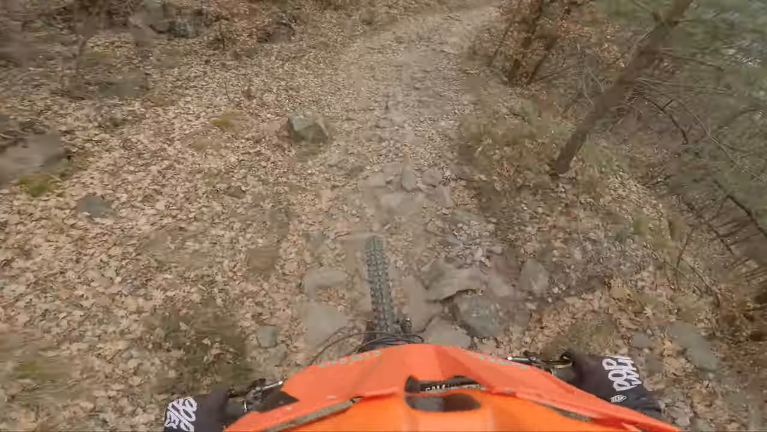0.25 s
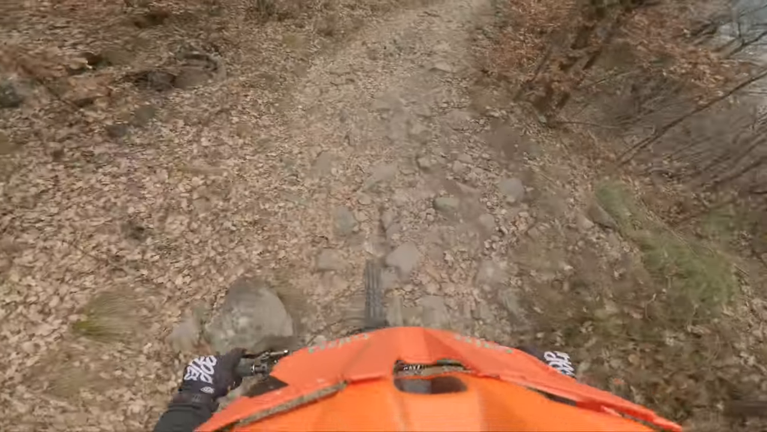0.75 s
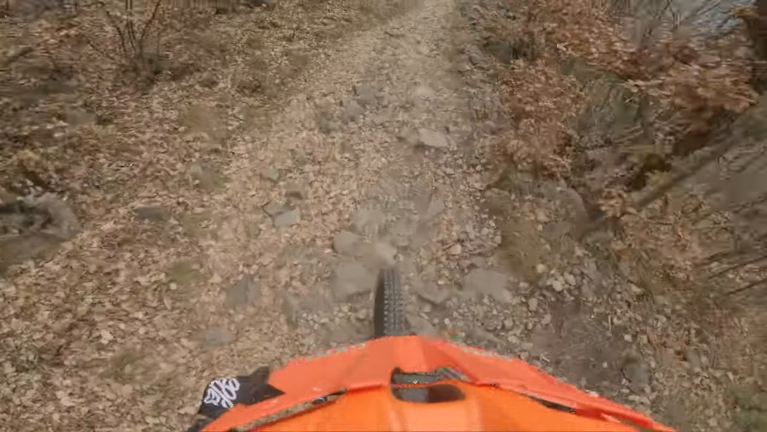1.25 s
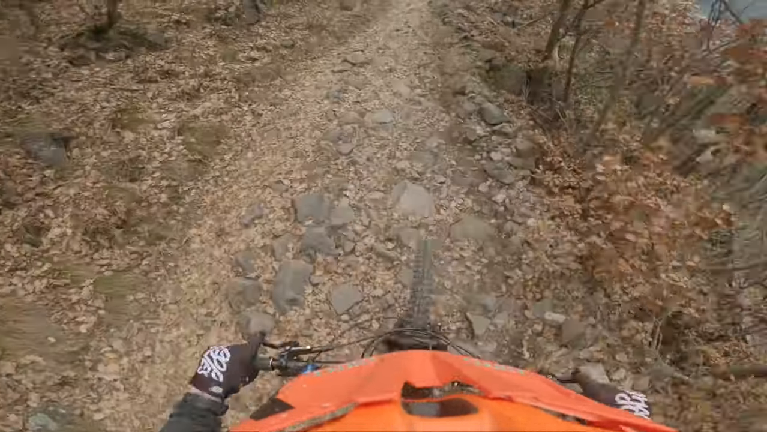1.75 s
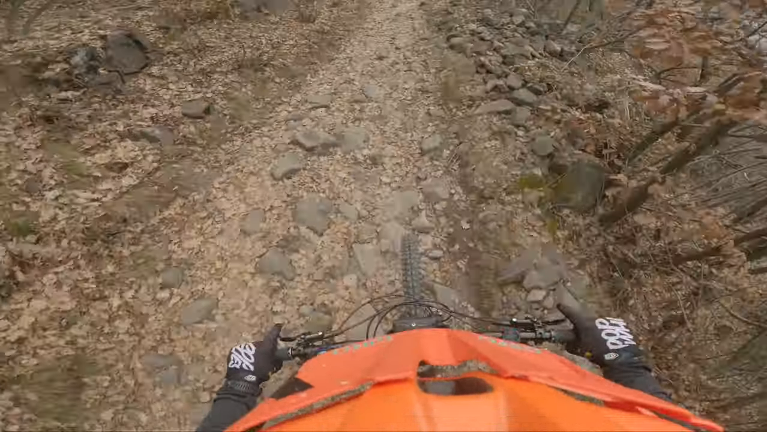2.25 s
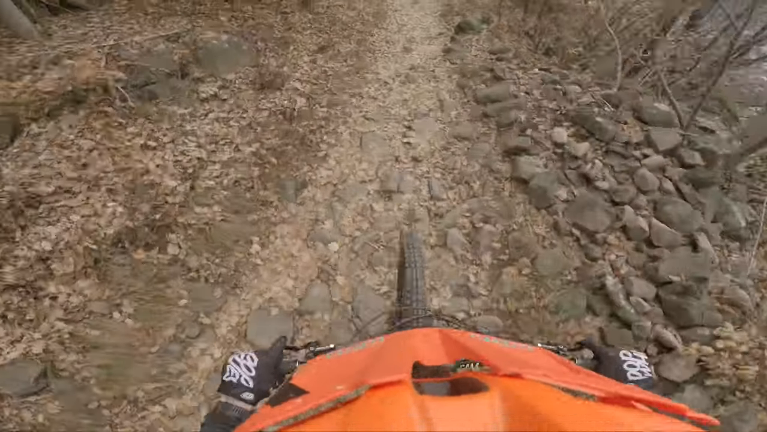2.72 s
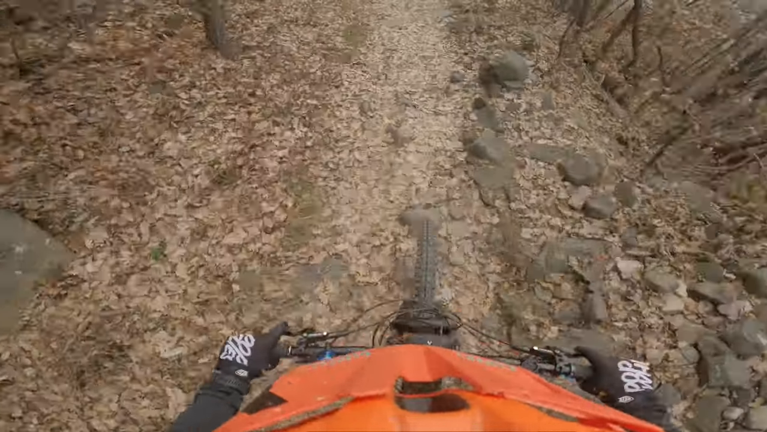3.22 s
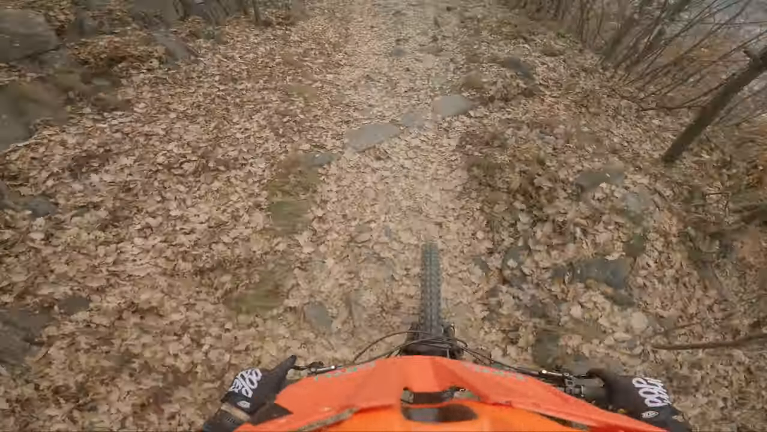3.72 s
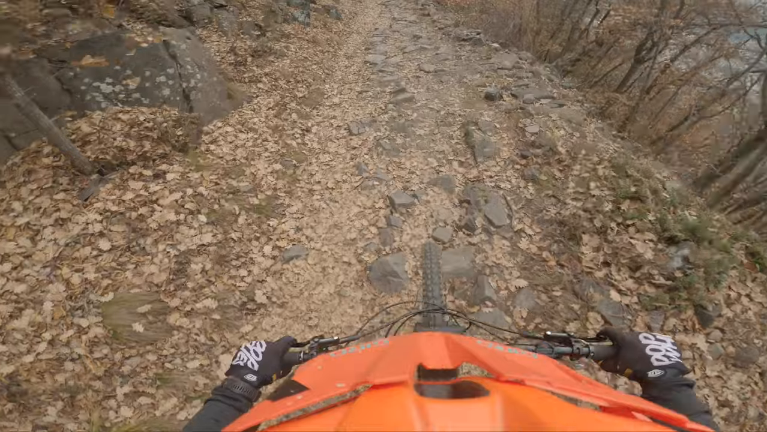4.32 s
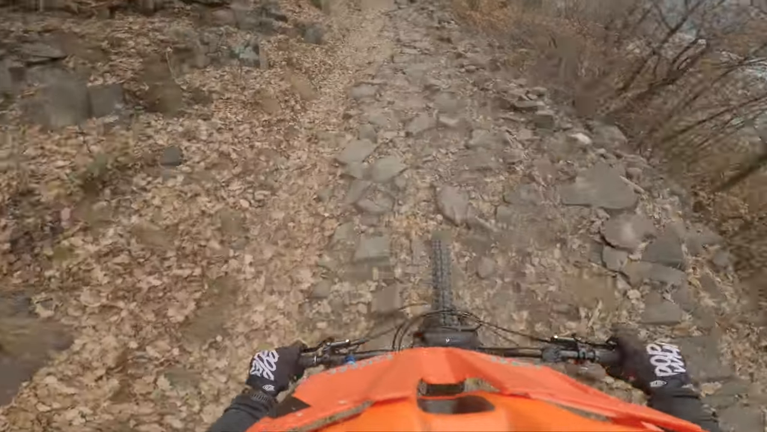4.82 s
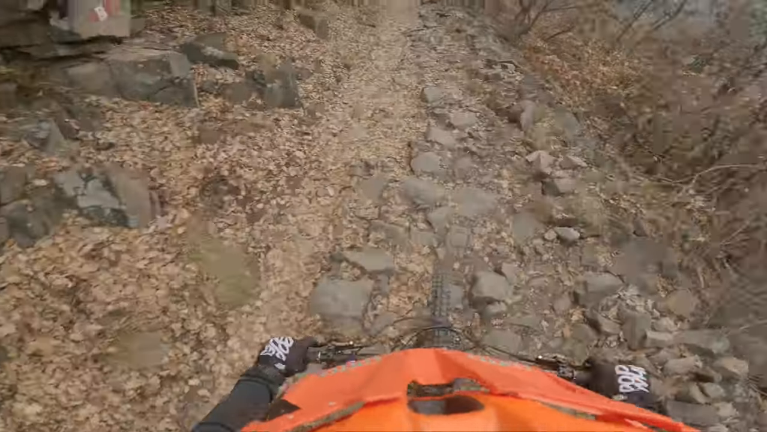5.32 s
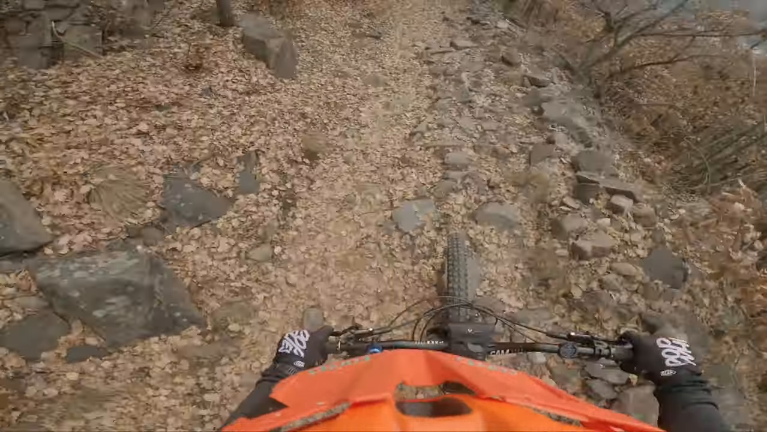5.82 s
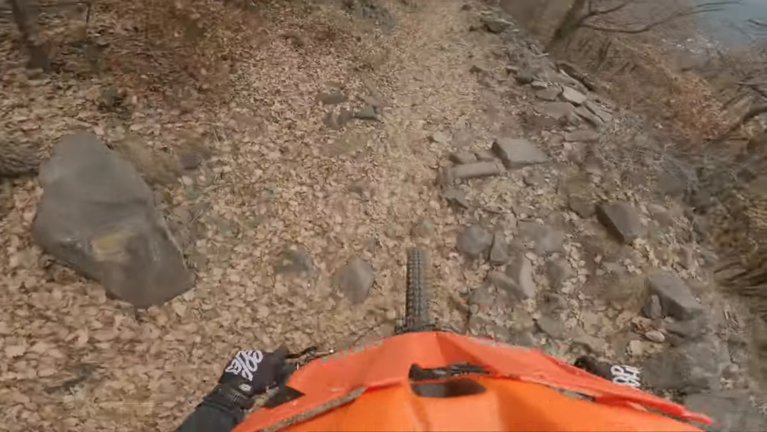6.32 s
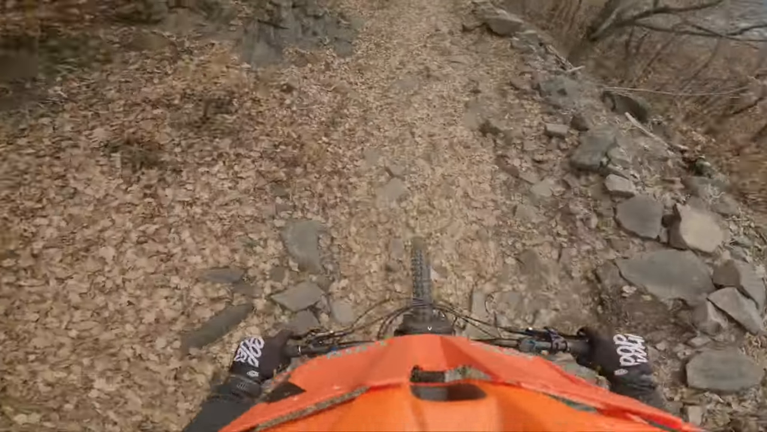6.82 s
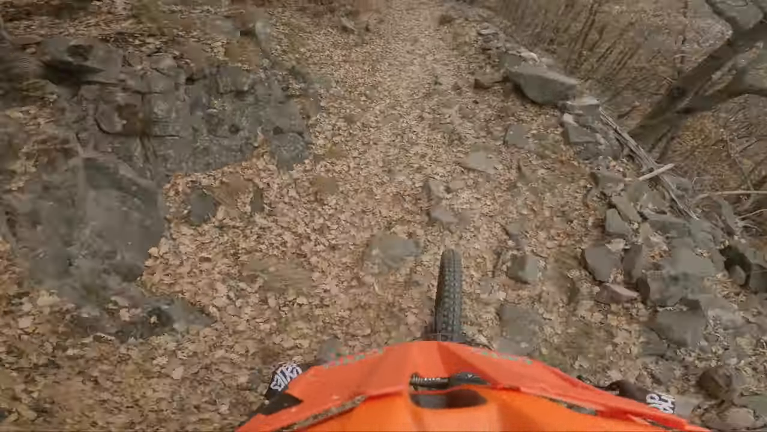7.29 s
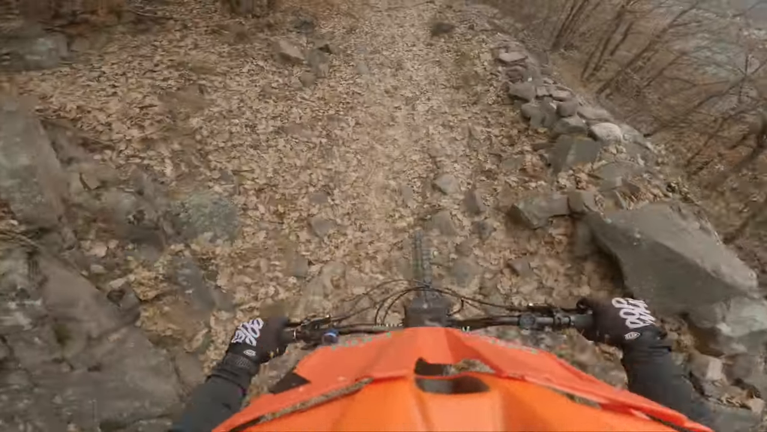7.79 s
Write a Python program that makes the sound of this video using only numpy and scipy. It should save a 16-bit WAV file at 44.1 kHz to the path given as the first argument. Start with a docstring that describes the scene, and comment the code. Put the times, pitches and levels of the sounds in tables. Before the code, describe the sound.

A mountain bike rolls quickly down a rocky forest trail for eight seconds, heard in mono from the rider's helmet. Throughout, tyres crunch stones and crackle dry leaves in clumpy bursts, with quick scuffs and tiny dropouts as the wheel skips, notably near 1.2, 2.0, 6.1 and 6.5 s. Irregular, very short, dry rock knocks strike the frame about a dozen times a second, amid fine pings of small stones and bright, thin metal ticks. Dull tyre thumps land strongly around 0.7, 2.0, 3.75, 4.2, 4.65, 5.8 and 6.35 s. Low wind buffets beneath, gusting sharply near 0.7 s, easing somewhat from 1.3 to 3.3 s, then growing heavier, especially 4 to 5.5 s, with further brief gusts until 7.6 s. A faint steady air hiss lies behind; peaks sound compressed and the very highest treble is dulled. The rattling continues right to the end.

```python
"""A mountain bike rolls down a stony trail, heard from the rider's helmet: its tyres crunch stones and
dry leaves (crackling noise), small stones ping the frame tubes and rocks knock them (fading sine tones).
Wind buffets the microphone port (low noise with sharper gusts), over a thin hiss of air.
A small metal part ticks brightly, and rocks thump the tyre casing with short dull notes."""
import sys
import numpy as np
from scipy import signal
from scipy.fft import rfft, irfft, next_fast_len
from scipy.io import wavfile
from scipy.ndimage import map_coordinates

SR = 44100
rng = np.random.default_rng(int(sys.argv[2]) if len(sys.argv) > 2 else 0)


def field_ratio(decibels):
    """Amplitude ratio for a level in dB (20 dB per decade); scalars and array-likes work."""
    return 10 ** (np.asarray(decibels, dtype=float) / 20)


def unload_wav(signal):
    """Save mono or channel-first audio to the path in sys.argv[1] as 16-bit WAV at rate SR, clipped to [-1, 1]."""
    wavfile.write(
        sys.argv[1],
        SR,
        np.round(np.clip(np.atleast_2d(signal).T, -1, 1) * 32767).astype(np.int16),
    )


N = 355137


def unit(x):
    """Scales a sound to rms 1."""
    return x / np.sqrt(np.mean(x ** 2) + 1e-20)


def curves(rows):
    """Draws straight lines between table rows: one curve for each column after the time."""
    s, *cols = np.transpose(rows)
    return [np.interp(np.arange(N) / SR, s, c) for c in cols]


def wobble(rate):
    """A smooth random curve with this many random points a second."""
    return map_coordinates(rng.standard_normal(N // 100), [np.arange(N) * rate / SR])


def coloured(x, spectrum):
    """Filters x through f/Hz, level/dB points, joined on a log frequency axis, to rms 1."""
    m = next_fast_len(N + 8192)  # spare room for the filter's tail
    hz, db = np.transpose(spectrum)
    log_hz = np.log(np.fft.rfftfreq(m, 1 / SR) + 1)
    gain = field_ratio(np.interp(log_hz, np.log(hz + 1), db))
    return unit(irfft(rfft(x, m) * gain, m)[:N])


def crackle(per_s, spread_db, life_s, hiss):
    """Short fading noise bursts of very uneven size, plus steady hiss."""
    when, size = rng.random(N), rng.exponential(size=N)
    starts = (when < per_s / SR) * field_ratio(spread_db * np.minimum(size, 3))
    t = np.arange(SR // 50) / SR
    bursts = np.abs(signal.fftconvolve(starts, np.exp(-t / life_s))[:N])
    return unit(bursts * rng.standard_normal(N)) + hiss * rng.standard_normal(N)


def ring(modes, attack_s, detune, crack):
    """One blow: each mode (a fading tone) varies in strength, pitch and phase; contact noise roughens it."""
    t = np.arange(SR // 16) / SR
    hz, db, t60 = np.transpose(modes)[:, :, None]
    strength, pitch, phase = rng.standard_normal((3, len(modes), 1))
    fade = field_ratio(db + 2 * strength - 60 * t / t60)
    partials = fade * np.sin(2 * np.pi * (hz * (1 + detune * pitch) * t + phase))
    contact_noise = np.convolve(rng.standard_normal(len(t)), np.hanning(32) / 8, "same")
    attack = (1 - np.exp(-t / attack_s)) ** 2
    return partials.sum(axis=0) * (1 + crack * contact_noise) * attack


def add(track, s, sound):
    """Mixes a sound into the track at time s."""
    part = track[max(round(s * SR), 0):][:len(sound)]
    part += sound[:len(part)]


def swell(peaks, rise_s, fall_s):
    """Spreads each peak into a rise before it and a fall after it."""
    t = np.arange(-SR // 8, SR // 8) / SR
    shape = np.exp(-np.abs(t) / np.where(t < 0, rise_s, fall_s))
    return np.abs(signal.fftconvolve(peaks, shape, "same"))


def held(rows, rise_s, fall_s):
    """Turns (start, length, dB) rows into a level curve with soft ends."""
    level = np.zeros(N)
    for s, length_s, db in rows:
        level[round(s * SR):round((s + length_s) * SR)] = field_ratio(db)
    return swell(level, rise_s, fall_s) / ((rise_s + fall_s) * SR)


def at_random(per_s):
    """Chance moments, each with three normal draws."""
    rows = rng.standard_normal((100, 3))
    s = np.cumsum(rng.exponential(size=100)) / per_s
    return np.column_stack([s, rows])[s < N / SR]


# Wind strength over time: [t/s, buffet level/dB, edge level/dB between gusts]
WIND_LEVELS = [(0.0, -24, -42), (0.22, -30, -45), (0.85, -19, -29.5), (0.94, -32, -36), (1.25, -25, -35),
               (1.34, -30.5, -38), (3.34, -24.5, -36.5), (3.81, -29.5, -34.5), (4.12, -20, -30),
               (4.75, -20, -24), (5.04, -16.5, -27), (5.09, -24.5, -36), (5.38, -17, -31),
               (5.58, -20.5, -40), (6.25, -21.5, -36), (6.95, -23, -31), (6.99, -29.5, -41),
               (7.17, -20.5, -31.5), (7.76, -22.5, -38), (8.05, -20, -39)]
# Sharp gusts: [start t/s, length t/s, edge level/dB before the ends are softened]
SHARP_GUSTS = [(0.052, 0.044, -23), (0.657, 0.043, -21.5), (0.757, 0.11, -21), (1.196, 0.036, -21),
               (2.236, 0.042, -21.5), (2.74, 0.041, -26), (3.47, 0.032, -20), (3.741, 0.032, -24),
               (4.018, 0.076, -19), (4.15, 0.12, -19), (4.307, 0.027, -32), (4.373, 0.63, -25.5),
               (5.166, 0.2, -25), (5.426, 0.066, -24), (5.744, 0.093, -19.5), (5.872, 0.084, -26.5),
               (6.073, 0.041, -23.5), (6.186, 0.04, -18.5), (6.272, 0.11, -23), (6.605, 0.027, -18),
               (6.9, 0.077, -23.5), (7.576, 0.05, -19.5)]
# Tone colour of the low buffet: [f/Hz, relative level/dB]
BUFFET_COLOUR = [(8.8, -39), (15, 2.5), (59, 9.5), (115, 3), (161, -10), (200, -31), (260, -53),
                 (440, -120)]
# Tone colour of the higher edge: [f/Hz, relative level/dB]
EDGE_COLOUR = [(65, -34), (110, 3), (157, 0), (204, 0), (346, -14), (700, -34), (910, -63), (1540, -120)]


def wind():
    """Eddies push the microphone port in lumps of low noise; sharper gusts reach higher."""
    buffet_db, edge_db = curves(WIND_LEVELS)
    gusts = held(SHARP_GUSTS, rise_s=0.0091, fall_s=0.012)
    lumps = wobble(24)
    buffet = unit(field_ratio(0.81 * lumps) * coloured(rng.standard_normal(N), BUFFET_COLOUR))
    flutter = field_ratio(2 * lumps + 3 * wobble(45))
    edge = unit(flutter * coloured(rng.standard_normal(N), EDGE_COLOUR))
    # a gust pushes the buffet too, 3 dB less than the edge
    buffet_level = np.hypot(field_ratio(buffet_db), field_ratio(-3) * gusts)
    edge_level = np.hypot(field_ratio(edge_db), gusts)
    return buffet_level * buffet + edge_level * edge


# Rolling tyres, before skips and scuffs: [t/s, stone crunch level/dB, leaf rustle level/dB]
ROLLING_LEVELS = [(0.0, -32.5, -41.5), (0.47, -31.5, -45), (0.76, -32, -41.5), (1.93, -30.5, -38.5),
                  (2.42, -32, -44), (2.6, -30.5, -38.5), (3.79, -30, -38.5), (4.31, -32.5, -42),
                  (4.75, -34, -43), (5.56, -30.5, -41), (5.72, -29.5, -36), (6.57, -33.5, -38.5),
                  (7.11, -31, -41.5), (8.05, -32, -35.5)]
# The wheel skips: [middle t/s, half length t/s, level/dB lost (below zero: gained)]
WHEEL_SKIPS = [(.19, 0.018, 3), (0.325, .04, 4), (0.55, 0.066, 8), (.66, 0.018, 5.5), (0.965, 0.017, 6),
               (1.09, 0.027, 6), (1.218, 0.028, 22), (1.414, 0.016, 14), (1.526, 0.022, 7.5),
               (1.735, 0.072, 3.5), (2.046, 0.026, 18), (3.075, 0.022, 15), (3.425, .04, 6),
               (3.635, 0.013, 9), (4.38, 0.026, 2.5), (4.488, .02, 9), (4.61, 0.028, 1), (4.714, 0.012, -1),
               (5.16, 0.054, 4.5), (5.264, .02, 5), (5.682, 0.063, 8), (5.802, 0.069, 9.5),
               (5.88, 0.029, 11), (6.076, 0.022, 22), (6.248, 0.033, 6.5), (6.37, 0.018, 3),
               (6.546, .04, 16), (6.922, 0.023, 8), (7.093, 0.018, 16), (7.466, 0.016, 5)]
# The tread drags through loose stones: [start t/s, length t/s, level/dB before the ends are softened]
TREAD_SCUFFS = [(0.045, 0.046, -27.5), (0.37, 0.071, -31), (0.898, 0.027, -29.5), (1.051, 0.025, -24.5),
                (1.118, 0.032, -27), (1.222, 0.028, -23.5), (1.427, 0.032, -26), (1.584, 0.051, -27),
                (1.644, 0.047, -26), (1.75, 0.048, -33), (1.894, 0.022, -28.5), (1.949, 0.12, -27),
                (2.107, 0.039, -24.5), (2.393, 0.066, -28), (2.577, 0.022, -23), (2.633, 0.094, -30.5),
                (2.746, 0.034, -30.5), (2.794, 0.075, -31), (3.034, 0.034, -24.5), (3.167, 0.032, -26),
                (3.246, 0.038, -24.5), (3.339, 0.051, -25), (3.507, 0.022, -25), (3.559, 0.052, -30.5),
                (3.742, 0.042, -28), (3.815, 0.024, -27.5), (4.064, 0.051, -26), (4.636, 0.057, -27),
                (4.974, 0.023, -24.5), (5.222, 0.026, -24.5), (5.352, 0.023, -24), (5.595, 0.023, -24.5),
                (5.636, 0.027, -21.5), (5.713, 0.03, -26), (5.897, 0.032, -27.5), (6.084, 0.071, -26.5),
                (6.3, 0.042, -27.5), (6.421, 0.065, -25), (6.522, 0.032, -25.5), (6.588, 0.063, -30.5),
                (6.939, 0.036, -23.5), (7.109, 0.041, -30), (7.277, 0.025, -29), (7.346, 0.058, -31.5),
                (7.685, 0.025, -28.5), (7.968, 0.03, -25), (8.02, 0.037, -29)]


def tread():
    """Levels of crunch and rustle: scuffs raise them, and rolling drops as the wheel skips."""
    t = np.arange(N) / SR
    skip_db = sum(loss_db * np.clip(1 - np.abs(t - s) / half_s, 0, 1) for s, half_s, loss_db in WHEEL_SKIPS)
    scuff = held(TREAD_SCUFFS, rise_s=0.0068, fall_s=0.0068)
    crunch, rustle = [field_ratio(db - skip_db) for db in curves(ROLLING_LEVELS)]
    leaf_scuff = field_ratio(-12) * scuff  # leaves lie under the stones
    return np.hypot(crunch, scuff), np.hypot(rustle, leaf_scuff)


# Tone colour of crunching stones: [f/Hz, relative level/dB]
STONE_COLOUR = [(210, 5), (350, -1), (791, -3), (1110, -3.5), (1600, -0.5), (1940, -5), (2430, -3.5),
                (4000, -27), (5200, -36), (8800, -120)]
# Tone colour of dry leaves, also lent to the air hiss: [f/Hz, relative level/dB]
LEAF_COLOUR = [(1760, -14), (3000, -3.5), (3680, -6), (4960, -10.5), (5980, -16), (7720, -20), (9150, -28),
               (11600, -39), (15100, -54), (22000, -120)]


def tyres():
    """Stones grind and leaves snap in clumps of crackle, as the tread loads and unloads."""
    crunch, rustle = tread()
    load = wobble(28)
    stone_crackle = crackle(per_s=180, spread_db=8.8, life_s=0.0056, hiss=0.92)
    stones = unit(field_ratio(1.07 * load) * coloured(stone_crackle, STONE_COLOUR))
    leaf_crackle = crackle(per_s=350, spread_db=9.3, life_s=0.0033, hiss=1.0)
    leaf_swing = field_ratio(1.03 * load + 1.6 * wobble(16))
    leaves = unit(leaf_swing * coloured(leaf_crackle, LEAF_COLOUR))
    return crunch * stones + rustle * leaves


def air():
    """Air past the helmet: a thin, nearly even hiss around -55 dB."""
    return field_ratio(-55 + 1.2 * wobble(11.0)) * coloured(rng.standard_normal(N), LEAF_COLOUR)


# Ringing tones of the frame in low, middle and high groups: [f/Hz, relative level/dB, 60 dB fade t/s]
FRAME_MODES = [
    [(643, -14, 0.014), (747, -4.5, 0.0064), (992, -8.5, 0.03), (1185, -4, 0.019), (1506, -3, 0.0095)],
    [(2418, 7, 0.013), (2754, 6.5, 0.0097), (3207, 0.5, 0.012)],
    [(3940, 10.5, 0.011), (5090, -1, 0.016), (5600, -4.5, 0.018)],
]
# Small stones hitting each of those groups: [pings per s, level/dB relative to the crunch]
STONE_PINGS = [(70, -7), (70, -16), (110, -40.5)]


def rattle():
    """Small stones of six kinds ping the frame at random, more loudly where the crunch is loud."""
    out = np.zeros(N)
    for modes, (per_s, db) in zip(FRAME_MODES, STONE_PINGS):
        when, size = rng.random((6, N)), rng.exponential(size=N)
        pings = (when < per_s / 6 / SR) * field_ratio(2.5 * np.minimum(size, 3))
        # each kind has its own pitch and strength
        kinds = [ring(modes, attack_s=0.00034, detune=0.099, crack=1.0) for _ in pings]
        pinging = signal.fftconvolve(pings, kinds, axes=1)[:, :N].sum(axis=0)
        out += field_ratio(db) * unit(pinging)
    crunch, _ = tread()
    return crunch * out


# Rock strikes: [t/s, level/dB of the low, of the middle and of the high frame modes]
ROCK_STRIKES = [(0.018, -26, -30, -39), (0.04, -12, -28, -29), (0.1, -26, -23, -40), (0.358, -22, -24, -39),
                (0.381, -26, -21.5, -28), (0.491, -21, -31, -34), (0.607, -28, -24, -44),
                (0.681, -11, -24.5, -39), (0.717, -12, -19, -33), (0.826, -12.5, -22.5, -32),
                (0.865, -13, -26, -45), (0.899, -7, -36, -41), (0.983, -21, -21, -38),
                (1.046, -20, -23, -39), (1.058, -6.5, -34, -41), (1.185, -21, -14.5, -34),
                (1.221, -23, -22, -35), (1.419, -20, -38, -38), (1.496, -13, -24.5, -24.5),
                (1.551, -22, -24.5, -28), (1.608, -20, -24, -25.5), (1.666, -27, -19.5, -33),
                (1.685, -18, -15.5, -30), (1.744, -33, -20, -32), (1.767, -20, -21, -26),
                (1.832, -22, -21.5, -34), (1.895, -15, -28, -30), (2.05, -20, -19, -47),
                (2.073, -25, -15.5, -25), (2.118, -22, -21, -32), (2.139, -12, -22, -22),
                (2.204, -15.5, -25, -32), (2.253, -12, -35, -32.5), (2.348, -16, -29, -40),
                (2.423, -19, -22.5, -24), (2.487, -13.5, -18, -32), (2.577, -16, -21, -31),
                (2.666, -18, -18.5, -30), (2.75, -19, -17.5, -38), (2.805, -23, -28, -25),
                (2.844, -15, -17.5, -29), (2.976, -20, -16.5, -33), (3.034, -13, -38, -38),
                (3.053, -6, -36, -45), (3.107, -17, -19, -26), (3.256, -15, -27, -36),
                (3.293, -17, -22, -22), (3.347, -15, -27, -44), (3.395, -15, -20, -48),
                (3.515, -25, -18.5, -38), (3.624, -23, -14.5, -25), (3.71, -27, -17.5, -35),
                (3.755, -12, -22, -29), (3.831, -23, -18.5, -32), (3.954, -17.5, -34, -27),
                (4.035, -11, -36, -42), (4.075, -16, -17, -39), (4.191, -17, -21, -41),
                (4.459, -19, -20.5, -23), (4.636, -13, -28, -40), (4.655, -27, -25, -35),
                (4.723, -19, -25, -40), (4.901, -35, -26.5, -44), (4.932, -22, -24, -30),
                (4.984, -6.5, -32, -49), (5.226, -23, -29, -30), (5.359, -20, -16, -39),
                (5.469, -17.5, -20, -31), (5.615, -30, -24, -27.5), (5.649, -14, -20, -29),
                (5.723, -24, -30, -39), (5.844, -14, -42, -33), (5.898, -28, -21, -27),
                (6.003, -27, -27, -33), (6.091, -9, -28, -43), (6.185, -16, -20.5, -36),
                (6.273, -28, -20.5, -38), (6.321, -22.5, -23, -27.5), (6.428, -26, -14, -35),
                (6.475, -10, -23, -23), (6.528, -24, -18, -36), (6.543, -27, -12, -24),
                (6.618, -11, -19, -27), (6.647, -11, -29, -25.5), (6.695, -22, -21, -45),
                (6.763, -17, -19, -28), (6.832, -24, -16.5, -45), (6.946, -24, -27, -35),
                (6.959, -18, -30, -37), (7.063, -16, -14.5, -34), (7.104, -23, -23.5, -29),
                (7.133, -31, -30, -25), (7.267, -13.5, -21, -49), (7.375, -19, -20, -31),
                (7.482, -14, -27, -42), (7.589, -16, -22, -26.5), (7.697, -16, -28, -43),
                (7.777, -13, -35, -31), (7.938, -23, -23.5, -37), (7.978, -17, -23, -30)]
# First contact of stone on metal: [f/Hz, level/dB above the middle group's, 60 dB fade t/s]
CONTACT_CRACK = [(2560, 2.5, .004), (4200, -8, .003)]


def knocks():
    """Each rock strike cracks, rings the frame's three mode groups and bounces twice, weaker."""
    out = np.zeros(N)
    small_db, spread_db = (-27, -27, -43), 4  # lesser strikes, 5.2 a second on average
    small = [(s, *(small_db + spread_db * np.array(chance))) for s, *chance in at_random(5.2)]
    for s, *groups_db in [*ROCK_STRIKES, *small]:
        delay_s = 0.0026 + 0.0051 * rng.random()
        add(out, s - .0002, field_ratio(groups_db[1]) * ring(CONTACT_CRACK, .0001, 0.087, 0.45))
        for modes, group_db in zip(FRAME_MODES, groups_db):
            add(out, s - .0003, field_ratio(group_db) * ring(modes, 0.00051, 0.014, 0.21))
            add(out, s + delay_s, field_ratio(group_db - 10.5) * ring(modes, 0.00019, 0.032, 0.81))
            add(out, s + 2.0 * delay_s, field_ratio(group_db - 23.0) * ring(modes, 0.00027, 0.048, 0.85))
    return out


# Clicks of the metal part: [t/s, level/dB, to which ticks() adds for the first blow]
METAL_TICKS = [(0.0543, -48), (0.1226, -48), (0.3905, -41), (0.6195, -42), (0.709, -41), (0.7562, -39),
               (0.838, -44), (0.9174, -38), (0.9945, -37.5), (1.129, -44), (1.2488, -35), (1.3414, -46),
               (1.3862, -46), (1.9034, -34.5), (2.4976, -43), (2.5867, -41), (2.6678, -46), (2.7105, -40),
               (2.8474, -44), (2.9894, -39.5), (3.049, -46), (3.2026, -37), (3.258, -41.5), (3.4116, -45),
               (3.5418, -42), (3.6845, -38.5), (3.796, -44), (4.1989, -40.5), (4.3261, -46), (4.4743, -40),
               (5.238, -43), (5.3163, -47), (5.3674, -42), (5.4615, -44), (5.658, -40.5), (5.7334, -44),
               (5.854, -40), (5.919, -37), (6.4617, -43), (6.8094, -38), (6.9476, -41), (7.1162, -46),
               (7.1786, -44), (7.2963, -42), (7.3936, -41), (7.6565, -36)]
# Ringing tones of the metal part: [f/Hz, relative level/dB, 60 dB fade t/s]
METAL_MODES = [(9060, -11.5, 0.033), (8570, -7, 0.011), (4750, 8.5, 0.007), (6250, -1.5, 0.0032),
               (15200, -21, .015)]


def ticks():
    """A small metal part clicks, rebounds once and rings briefly."""
    out = np.zeros(N)
    faint = [(s, -51 + 3 * chance) for s, chance, *_ in at_random(3)]  # 3 a second on average
    for s, db in [*METAL_TICKS, *faint]:
        add(out, s - .0004, field_ratio(db + 9.5) * ring(METAL_MODES, 0.0001, 0.0042, 0.98))
        rebound_s = s + 0.0032 + 0.0029 * rng.random()
        add(out, rebound_s, field_ratio(db) * ring(METAL_MODES, 0.00028, .003, 1.7))
    return out


# Rocks hitting the tyre casing: [t/s, level/dB before thumps() adds 2 dB, main note f/Hz]
CASING_THUMPS = [(0.677, -9.5, 150), (0.766, -4, 149), (1.302, -15, 300), (1.44, -16, 191),
                 (1.765, -13.5, 148), (2.026, -8, 226), (3.348, -15.5, 211), (3.753, -9.5, 246),
                 (4.161, -6.5, 229), (4.206, -11.5, 246), (4.395, -19, 194), (4.648, -9, 190),
                 (4.806, -14.5, 222), (5.33, -14, 254), (5.795, -10.5, 290), (6.338, -8.5, 202),
                 (6.614, -14, 171), (7.601, -17, 178)]


def thumps():
    """The tyre casing bottoms on a rock: a short dull note with weaker tones above and below it."""
    out = np.zeros(N)
    for s, db, hz in CASING_THUMPS:
        modes = [(hz, 0, .04), (1.72 * hz, -3, .03), (2.22 * hz, -7, .025), (0.606 * hz, -3, .04)]
        add(out, s - .002, field_ratio(db + 2.0) * ring(modes, attack_s=0.0017, detune=0.049, crack=0.3))
    return out


def scene():
    """Adds all sources at the single microphone."""
    return (wind() + tyres() + air() + rattle() + knocks() + ticks() + thumps())[None]


def roll_off(x):
    """The treble ends steeply here."""
    return signal.sosfilt(signal.butter(12, 15500, fs=SR, output="sos"), x)


def record(dry):
    """Gain control ducks after loud moments, peaks are squeezed and the treble rolls off."""
    knee, squeeze, release_s = 0.2, 0.25, 0.027
    t = np.arange(SR // 8) / SR
    memory = np.exp(-t / release_s)
    power = signal.fftconvolve(dry ** 2, memory[None] / memory.sum(), axes=1)[:, :N]
    ducked = dry * (1 + np.abs(power) / knee ** 2) ** (-squeeze / 2)
    top, hard = .6, 3.5  # the highest peak allowed here, and how sharply it is reached
    squeezed = ducked / (1 + np.abs(ducked / top) ** hard) ** (1 / hard)
    treble_cut = signal.butter(N=4, Wn=12600, fs=SR, output="sos")
    mix = signal.sosfilt(treble_cut, squeezed)
    return roll_off(mix)


dry = scene()
out = record(dry)
unload_wav(out)
```